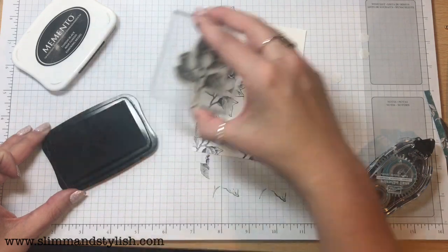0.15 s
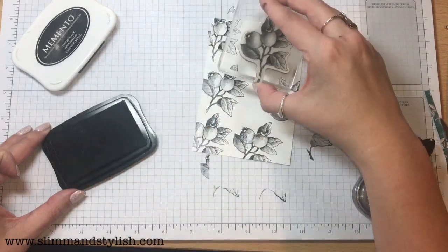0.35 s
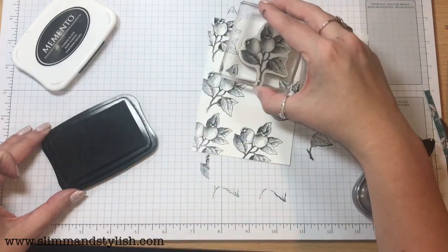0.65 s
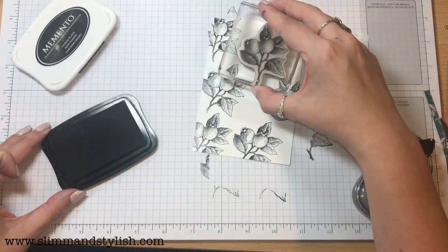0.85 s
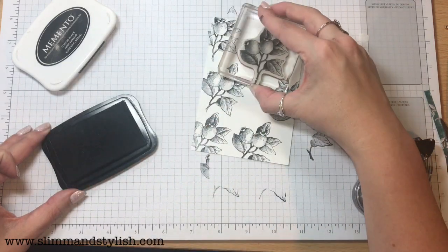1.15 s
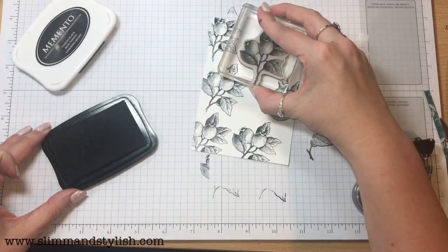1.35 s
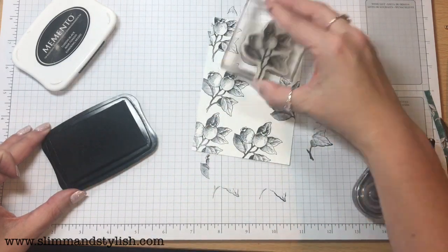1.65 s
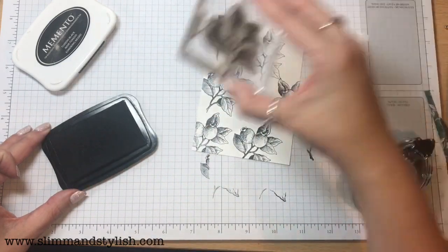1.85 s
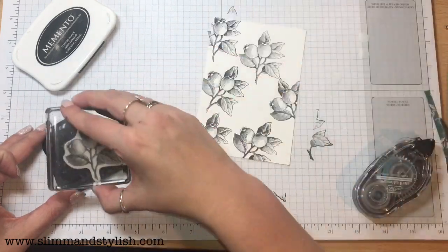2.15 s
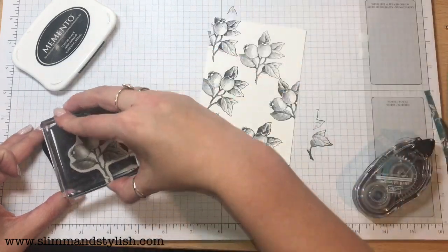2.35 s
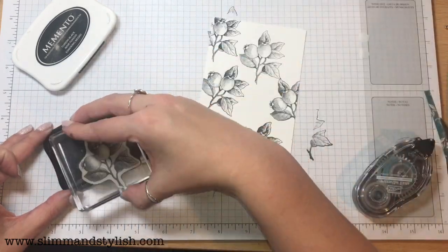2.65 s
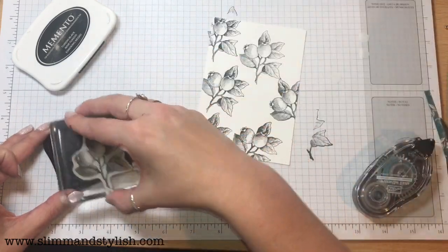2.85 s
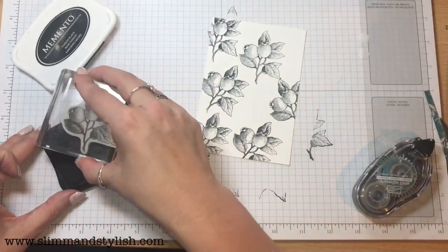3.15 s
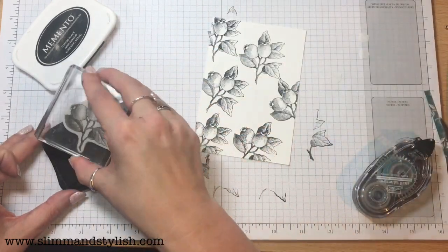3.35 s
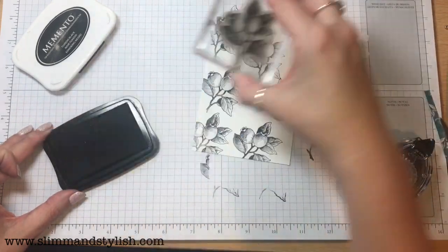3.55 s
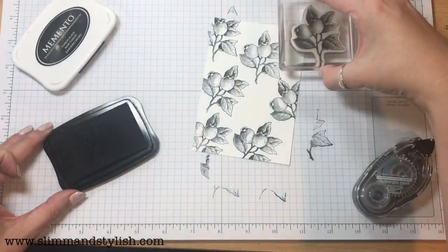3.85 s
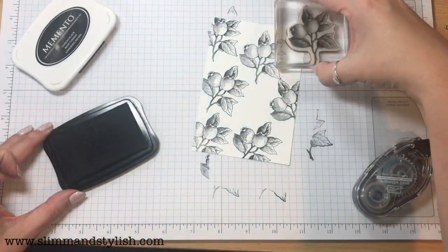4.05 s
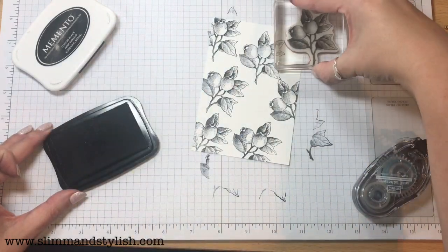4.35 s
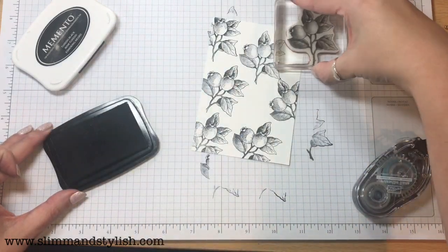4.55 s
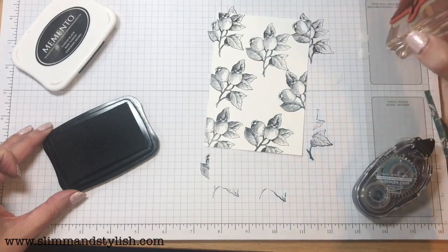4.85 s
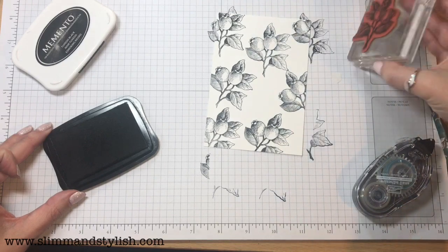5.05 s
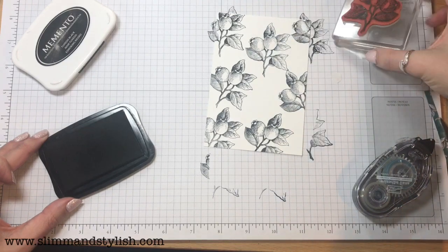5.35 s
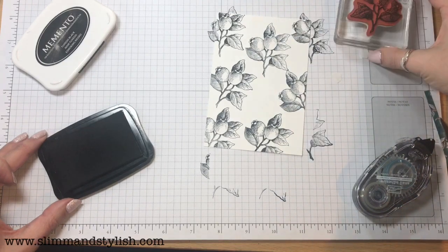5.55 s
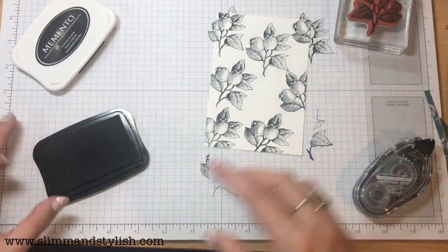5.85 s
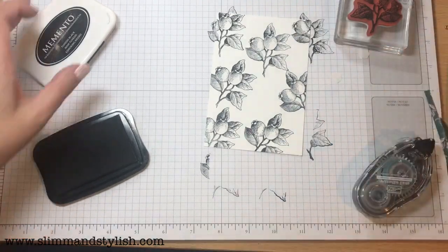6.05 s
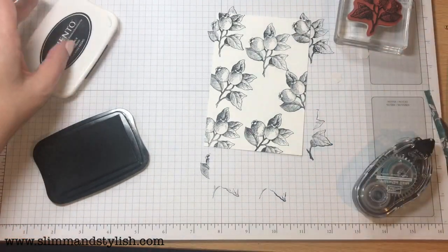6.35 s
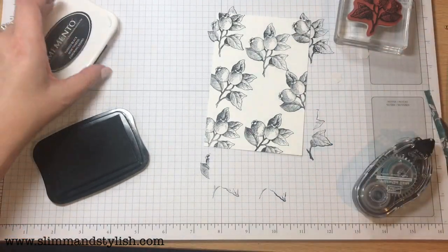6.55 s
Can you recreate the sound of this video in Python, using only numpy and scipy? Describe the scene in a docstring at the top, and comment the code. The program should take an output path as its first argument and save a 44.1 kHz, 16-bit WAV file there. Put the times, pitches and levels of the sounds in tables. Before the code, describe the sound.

An acrylic stamp block thumps on card and dabs an ink pad with sticky peels, then a plastic lid rattles.

```python
"""A craft table in a small room: an acrylic stamp block is pressed on card, peeled off, dabbed on an
ink pad and pressed again. Each landing is an impact that excites the modes of the table and the room
(a thump) and of the block (a clack). As the rubber lifts, threads of tacky ink snap in a crackle.
The block is set down and slid aside with a hiss of friction; then the plastic lid of the pad is
grabbed, and its shell rings as it knocks and skids on the mat."""
import sys
import numpy as np
from scipy import signal
from scipy.fft import rfft, irfft, next_fast_len
from scipy.io import wavfile
from scipy.ndimage import uniform_filter1d

SR = 44100
rng = np.random.default_rng(int(sys.argv[2]) if len(sys.argv) > 2 else 0)


def unload_audio(sound):
    """Save the sound as a 16-bit wav file, at the path given as the first command line argument."""
    columns = np.transpose(np.atleast_2d(sound))
    # keep every value between -1 and 1, then stretch to whole-number steps
    steps = np.round(np.clip(columns, -1, 1) * 32767)
    wavfile.write(sys.argv[1], SR, steps.astype(np.int16))


N = 295558
TIME = np.arange(N) / SR

# Spectral envelopes of the noises: frequency_hz, relative_density_db
ROOM_TONE_SPECTRUM = [(25, -19.5), (42, 0.5), (55, -2.5), (100, -6), (152, -10), (175, -12.5), (245, -16),
                      (295, -12), (330, -11), (375, -18.5), (540, -20.5), (2000, -30), (9000, -35.5),
                      (10300, -38.5), (12400, -34.5), (15800, -36.5)]
PAD_SPECTRUM = [(400, -4.5), (900, -9.5), (1500, -5), (1900, -21), (5000, -22), (12000, -32)]  # rubber wiping the ink pad
FAINT_HISS_SPECTRUM = [(600, -4.5), (1400, -6), (2200, -6), (3200, -13), (5000, -17), (12000, -27)]  # like a breath or a light brush
SLIDE_SPECTRUM = [(350, -2), (600, -3.5), (716, -10), (902, -0.5), (1140, -2.5), (1270, 0), (1380, -10),
                  (2010, -2.5), (4030, -9), (5440, -4.5), (7540, -7.5), (8520, -5), (15500, -13.5)]  # block sliding on the mat
FINGER_SPECTRUM = [(2000, -24), (4200, -14), (5000, -9), (5530, -1), (6200, -11), (7000, -2), (7600, -8),
                   (8580, 5), (9200, -11), (9600, 1), (10700, -13), (12100, -9), (14400, -14), (15800, -21)]  # skin dragging on acrylic
CREAK_SPECTRUM = [(1000, -5), (1900, 1), (2400, 2), (3400, -0.5), (4500, -11), (6500, -12), (12000, -36)]  # rubber rocking on the pad
TACK_SPECTRUM = [(600, -8), (1100, -2.5), (1800, -10), (3500, -3.5), (5500, 0), (9000, -5.5), (12000, -9),
                 (15500, -6.5)]  # sticky surfaces parting
BLOCK_DENSE_SPECTRUM = [(300, 16), (600, -10), (1200, -2), (2500, -2.5), (5000, -4), (9000, -13),
                        (15500, -13.5)]  # overlapping modes of the block
LID_DENSE_SPECTRUM = [(300, -12), (700, 6.5), (1300, 2), (3000, -1), (6000, -7.5), (10000, -13),
                      (15500, -15.5)]  # overlapping modes of the lid

# Resonances: pitch_hz, relative_level_db, t60_s
LOW_BOOM_MODES = [(45.3, -22, 0.83), (66.2, -27.5, 0.79), (103.6, -15.5, 0.078), (122, -12, 0.25),
                  (151.2, -12.5, 0.25), (188, -25, 0.22), (214, -18.5, 0.11)]  # low boom of the table and the room
TABLE_UPPER_MODES = [(331, -10, 0.14), (347, -26, 0.087), (428, -21, 0.062), (564, -12, .07)]
BLOCK_MODES = [(818, -2.5, 0.068), (986, 8.5, 0.042), (1252, 5, 0.047), (1350, -17, 0.048),
               (1970, -21, 0.023), (2320, -11, 0.029), (2530, 1, 0.02), (3400, -38, 0.039),
               (3610, 13, 0.012), (5700, -5, 0.074)]
LID_MODES = [(548, -0.5, 0.037), (827, 0.5, 0.041), (1241, 0, 0.076), (1400, 1.5, 0.056), (1940, -8, 0.078),
             (2190, -4, 0.026), (2780, -18, 0.041), (3530, -7, 0.031), (4420, -4, 0.037),
             (5340, -8.5, 0.041), (6570, -11.5, 0.039)]

# Early reflections from the near walls and ceiling: delay_s, gain_db
REFLECTIONS = [(0.0184, -20.5), (0.0305, -22.5), (.060, -25.5), (.108, -40)]
# Faint soft hisses, like a breath or a light brush: start_s, end_s, level_db
FAINT_HISSES = [(3.28, 3.42, -68.5), (4.39, 4.52, -73), (4.77, 5.05, -72.5), (5.9, 6.12, -70)]
# The rubber wipes over the ink pad: start_s, end_s, level_db
PAD_WIPES = [(1.97, 2.13, -70), (2.29, 2.38, -68), (2.72, 2.78, -74.5)]
# The rubber creaks as the block rocks; the hand leans on the table: peak_s, level_db
CREAKS = [(2.864, -64.5), (2.892, -63)]
HAND_NUDGES = [(1.685, -49), (2.105, -47), (2.143, -42), (2.349, -50), (2.813, -51), (4.298, -52.5),
               (4.547, -51.5)]
# Light ticks of the held block: start_s, level_db, tilt_db_per_octave, spot_hz
BLOCK_TICKS = [(2.324, -50.5, -9, 1580), (2.9603, -53, 0, 2660), (2.9886, -52, -4, 2700),
               (3.2212, -57, 4, 9000), (3.42, -56.5, 2, 2200), (4.651, -49, 2.5, 4550),
               (5.259, -43, -3, 1195)]
# The inked rubber peels off: start_s, release_s, crackle_db, fade_s, first_pop_db, last_pop_db,
# last_pop_tilt_db_per_octave
PEELS = [(1.5542, 1.6003, -50, .006, -55.5, -39.5, -7), (2.324, 2.383, -56.5, .022, -64, -60, 0),
         (2.7638, 2.7939, -58, .012, -54, -47.5, 6), (3.271, 3.296, -56.5, 0.036, -56, -38, 7.5),
         (4.47, 4.557, -56, 0.013, -58, -48, -0.5)]
# The block meets the ink pad: start_s, thump_db, contact_ms, low_modes_db, upper_modes_db, rim_tick_db
PAD_DABS = [(2.050, -42.5, 1.5, 0.5, 9, -55.5), (2.562, -32, 2.33, -0.5, 14, -43.5),
            (3.008, -36, 2.72, 4.5, 9, -60.5)]
# The lid is shoved: start_s, knock_db, tilt_db_per_octave, spot_hz, thump_db, contact_ms, bounce_db,
# skid_s, skid_db, catch_db
LID_SHOVES = [(6.095, -61, 0, 1200, -55.5, 1.2, -62, .017, -51.5, -61),
              (6.1469, -28.5, 4, 3170, -48, 1.1, -38, .031, -37.5, -27.5),
              (6.22, -29, -3, 550, -28, 0.46, -44, 0.022, -46, -41),
              (6.4834, -45.5, 1, 900, -37, 0.97, -41.5, 0.035, -47, -45.5)]
# Moments at which the lid's rim catches: share_of_skid
RIM_CATCHES = [.4, .72, 0.95]
# The block lands twice on card, then on the bare mat: start_s, flop_s, edge_db, clack_db,
# tilt_db_per_octave, spot_hz, thump_db, contact_ms, low_cut_hz, low_modes_db, upper_modes_db
BLOCK_LANDINGS = [(1.006, .007, -40, -41, -3, 980, -30.5, 1.76, 71.4, -0.5, 9),
                  (4.027, 0.0088, -40.5, -37.5, -4, 1160, -14, 1.82, 160, -9.5, -13),
                  (5.0322, .0118, -34.5, -24.5, -1, 1030, -18.5, 1.22, 114, 2, -1.5)]


def from_db(db):
    """Amplitude ratio of a level in decibels."""
    return 10 ** (np.asarray(db) / 20)


def unit(x):
    """Normalisation to unit energy."""
    return x / np.sqrt(np.sum(x ** 2) + 1e-20)


def add(out, start_s, x):
    """Superposition: a short sound is added from start_s on."""
    at = round(start_s * SR)
    out[at:at + len(x)] += x[:N - at]


def through(x, response):
    """Convolution: a linear system answers each sample with its impulse response."""
    return signal.fftconvolve(x, response)[:len(x)]


def coloured(x, spectrum):
    """Spectral shaping that keeps the power of white noise; 12 dB per octave roll-off in the bass."""
    size = next_fast_len(len(x) + SR // 20)
    hz, db = np.transpose(spectrum)
    bins = np.maximum(np.fft.rfftfreq(size, 1 / SR), 1)
    gain = from_db(np.interp(np.log(bins), np.log(hz), db))
    gain *= np.minimum(bins / hz[0], 1) ** 2
    gain /= np.sqrt(np.mean(gain ** 2))
    return irfft(rfft(x, size) * gain, size)[:len(x)]


def sized(hit, db, tilt_db):
    """Spectral tilt of tilt_db per octave; db is the level the energy would have within 1 ms."""
    tilt = [(2 ** octave, tilt_db * octave) for octave in (8, 14)]
    return from_db(db) * unit(coloured(hit, tilt)) * np.sqrt(SR / 1000)


def decay(t, t60_s):
    """Damping: the amplitude falls exponentially, by 60 dB in t60_s."""
    return np.exp(-np.log(1000) * t / t60_s)


def held(start_s, end_s, edge_s):
    """Envelope with exponential growth, a plateau at 1, and exponential decay."""
    return np.exp(-np.abs(TIME - np.clip(TIME, start_s, end_s)) / edge_s)


def ringing(modes, t):
    """Free vibration: each mode is a damped sinusoid, one to a row."""
    return np.array([from_db(db) * np.sin(2 * np.pi * hz * t) * decay(t, t60) for hz, db, t60 in modes])


def room_tone(level_db):
    """Stationary noise, strongest in the bass, forms the background."""
    return from_db(level_db) * coloured(rng.standard_normal(N), ROOM_TONE_SPECTRUM)


def reverberation(x, wet_db, t60_s, tail_cut_hz, echo_cut_hz):
    """Reflection: dull early echoes and a short diffuse tail follow the direct sound."""
    t, out = TIME[:SR // 2], x.copy()
    dull = signal.sosfilt(signal.butter(1, echo_cut_hz, fs=SR, output="sos"), x)
    for delay_s, db in REFLECTIONS:
        add(out, delay_s, from_db(db) * dull)
    build_up = 1 - np.exp(-t / 0.0013)
    tail = unit(rng.standard_normal(len(t)) * decay(t, t60_s) * build_up)
    tail = signal.sosfilt(signal.butter(1, tail_cut_hz, fs=SR, output="sos"), tail)
    return out + from_db(wet_db) * through(x, tail)


def grainy_noise(envelope, spectrum, grain_db):
    """Random amplitude modulation gives noise a grain, like the uneven slips of sliding friction."""
    roughness = unit(uniform_filter1d(rng.standard_normal(N), size=200)) * np.sqrt(N)
    noise = rng.standard_normal(N) * from_db(grain_db * roughness)
    return envelope * coloured(noise, spectrum)


def soft_hisses(spans, spectrum):
    """Broadband noise swells, holds and fades over each span, heard as a soft hiss."""
    envelope = sum(from_db(db) * held(start, end, edge_s=0.041) for start, end, db in spans)
    return grainy_noise(envelope, spectrum, grain_db=1.5)


def swarm(swells, clicks_per_s, spread_db):
    """Shot noise: random clicks swell and fade. Swells: peak_s, level_db, growth_s, fade_s."""
    envelope = sum(from_db(db) * np.exp(-np.maximum((s - TIME) / growth_s, (TIME - s) / fade_s))
                   for s, db, growth_s, fade_s in swells)
    sizes = from_db(spread_db * np.minimum(rng.exponential(1, N), 4))
    signs = rng.choice([-1, 1], N)
    occurs = rng.random(N) < clicks_per_s / SR
    return envelope * unit(sizes * signs * occurs) * np.sqrt(N)


def block_slide():
    """Friction grows with speed: the block creeps over the mat, then a push peaks and dies away."""
    push_s, push_width_s = 5.29, 0.088
    creep = from_db(-63.5) * held(5.08, 5.33, edge_s=0.035)
    push = from_db(-60.5) * np.exp(-np.abs(TIME - push_s) / push_width_s)
    return grainy_noise(creep + push, SLIDE_SPECTRUM, grain_db=1.0)


def finger_release():
    """Friction, then adhesion: the fingers drag off the block ever faster and come unstuck."""
    start_s, end_s, unstick_s, growth_db_per_s = 5.534, 5.675, 5.72, 27
    drag_db = -58.5 + growth_db_per_s * (np.clip(TIME, start_s, end_s) - start_s)
    envelope = from_db(drag_db) * held(start_s, end_s, edge_s=0.013)
    drag = grainy_noise(envelope, FINGER_SPECTRUM, grain_db=-0.3)
    unstick = swarm([(unstick_s, -61, 0.0087, 0.01)], clicks_per_s=9000, spread_db=6.0)
    return drag + coloured(unstick, TACK_SPECTRUM)


def thump(peak_s, db, contact_ms, low_db=0, upper_db=0, low_cut_hz=None):
    """Resonance: a force pulse rings the table's upper modes and the low boom of table and room."""
    out, t = np.zeros(N), TIME[:SR // 2]
    lead_s, contact_s = 0.015, contact_ms / 1000
    # The sound follows the velocity, the slope of the displacement.
    low = np.diff(ringing(LOW_BOOM_MODES, t).sum(axis=0), prepend=0)
    upper = np.diff(ringing(TABLE_UPPER_MODES, t).sum(axis=0), prepend=0)
    force = np.exp(-0.5 * ((t - lead_s) / contact_s) ** 2)
    # A brief contact moves only part of the table top, so it gives less bass.
    low_cut = signal.butter(2, low_cut_hz or 0.13 / contact_s, "high", fs=SR, output="sos")
    push = signal.sosfilt(low_cut, force + 1e-18)
    ring = through(push, from_db(low_db) * low + from_db(upper_db) * upper)
    gain = from_db(db) / np.abs(push).max()
    add(out, peak_s - lead_s, gain * (push + from_db(-3.5) * ring))
    return out


def body_response(modes, dense_spectrum, modes_db, dense_t60_s, crack_db):
    """Impulse response of a hard body: a crack, a dense ring and distinct modes of random strength."""
    t = TIME[:SR // 6]
    strengths = from_db(rng.normal(0, 0.36, len(modes))) * rng.choice([-1, 1], len(modes))
    envelope = unit(decay(t, dense_t60_s)) + from_db(crack_db) * unit(decay(t, 0.011))
    dense = coloured(rng.standard_normal(len(t)) * envelope, dense_spectrum)
    distinct = unit(strengths @ ringing(modes, t))
    return unit(unit(dense) + from_db(modes_db) * distinct)


def impacts(hits, modes, dense_spectrum, modes_db, dense_t60_s, crack_db, chatter_db, spot_db):
    """Impact excitation: a click and its chatter ring a body; the struck spot stresses one band.
    Hits: start_s, level_db, chatter_ms, tilt_db_per_octave, spot_hz."""
    out, t = np.zeros(N), TIME[:SR // 6]
    clicks_per_s = 3000
    for s, db, chatter_ms, tilt_db, spot_hz in hits:
        clicks = rng.standard_normal(len(t)) * (rng.random(len(t)) < clicks_per_s / SR)
        force = from_db(chatter_db) * clicks * np.exp(-t * 1000 / chatter_ms)
        force[0] += 1
        hit = through(force, body_response(modes, dense_spectrum, modes_db, dense_t60_s, crack_db))
        spot = signal.lfilter(*signal.iirpeak(spot_hz, Q=5.0, fs=SR), hit)
        add(out, s, sized(hit + from_db(spot_db) * spot, db, tilt_db))
    return out


def clacks(hits):
    """Hard impacts excite the heavily damped modes of the acrylic block."""
    return impacts(hits, BLOCK_MODES, BLOCK_DENSE_SPECTRUM, modes_db=-8.5, dense_t60_s=0.053,
                   crack_db=-7.0, chatter_db=3.0, spot_db=3.0)


def pressing():
    """Stick-slip makes the rubber creak, while light impacts tick the block and nudge the table."""
    chatter_ms, growth_s, fade_s = 0.77, 0.0055, 0.017
    ticks = clacks([(s, db, chatter_ms, tilt_db, spot_hz) for s, db, tilt_db, spot_hz in BLOCK_TICKS])
    slips = swarm([(s, db, growth_s, fade_s) for s, db in CREAKS], clicks_per_s=1500, spread_db=1.0)
    nudges = sum(thump(s, db, contact_ms=1.7, low_db=-4, upper_db=16) for s, db in HAND_NUDGES)
    return ticks + coloured(slips, CREAK_SPECTRUM) + nudges


def ink_peels():
    """Adhesive failure: one thread of ink snaps, a growing swarm follows, and the last patch pops."""
    growth_share, pop_t60_s, first_tilt_db = 0.32, 0.010, -1
    swells = [(release_s, db, growth_share * (release_s - start_s), fade_s)
              for start_s, release_s, db, fade_s, *_ in PEELS]
    out = coloured(swarm(swells, clicks_per_s=7500, spread_db=5.0), TACK_SPECTRUM)
    t = TIME[:SR // 50]
    for start_s, release_s, _, _, first_db, last_db, last_tilt_db in PEELS:
        for s, db, tilt_db in (start_s, first_db, first_tilt_db), (release_s, last_db, last_tilt_db):
            pop = coloured(rng.standard_normal(len(t)) * decay(t, pop_t60_s), TACK_SPECTRUM)
            add(out, s, sized(pop, db, tilt_db))
    return out


def card_snap(snap_s):
    """Elastic release: the clinging card flicks and snaps off the block, then slaps the table."""
    flick = (snap_s - 0.0075, -39, 2.1, 0.5, 1090)
    snap = (snap_s, -35, 2.2, 0.5, 3160)
    slap = thump(snap_s + 0.00423, db=-46, contact_ms=0.87, low_db=5.5, upper_db=13.5, low_cut_hz=220)
    return clacks([flick, snap]) + slap


def pad_dabs():
    """Cushioned impact: the pad's rim ticks, then the felt softens the blow and bottoms out."""
    rim_lead_s, rim_chatter_ms, rim_tilt_db, rim_hz = 0.011, 2.9, -0.5, 1310
    bottom_lag_s = 0.00496
    thumps, ticks = np.zeros(N), []
    for s, db, contact_ms, low_db, upper_db, tick_db in PAD_DABS:
        ticks.append((s - rim_lead_s, tick_db, rim_chatter_ms, rim_tilt_db, rim_hz))
        thumps += thump(s, db, contact_ms, low_db, upper_db)
        thumps += thump(s + bottom_lag_s, tick_db + 11.5, contact_ms=0.99, low_db=-15, upper_db=1)
    return thumps + clacks(ticks)


def lid_rattle():
    """Shell resonance: the shoved lid knocks, bounces, skids with its rim catching, and bumps to rest."""
    table_lag_s, bounce_s, growth_s, fade_s = 0.00134, 0.0075, 0.014, 0.0093
    coupling = dict(low_db=5.5, upper_db=-12.5, low_cut_hz=171)  # how the light lid drives the table
    thumps, hits, skids = np.zeros(N), [], []
    for (s, knock_db, tilt_db, spot_hz, thump_db, contact_ms,
         bounce_db, skid_s, skid_db, catch_db) in LID_SHOVES:
        knock = (s, knock_db, 2.8, tilt_db, spot_hz)
        bounce = (s + bounce_s, bounce_db, 0.9, 2, 820)
        catches = [(s + share * skid_s, catch_db, 2.9, 1.5, 1880) for share in RIM_CATCHES]
        hits += [knock, bounce, *catches]
        skids.append((s + skid_s, skid_db, growth_s, fade_s))
        thumps += thump(s + table_lag_s, thump_db, contact_ms, **coupling)
        thumps += thump(s + bounce_s, thump_db - 7.5, contact_ms=1.8, **coupling)
        thumps += thump(s + skid_s, skid_db + 0.5, contact_ms=0.91, **coupling)
    knocks = impacts(hits, LID_MODES, LID_DENSE_SPECTRUM, modes_db=1.0, dense_t60_s=0.089,
                     crack_db=-0.5, chatter_db=-2.5, spot_db=0.0)
    slips = swarm(skids, clicks_per_s=6400, spread_db=2.0)
    # Each slip radiates directly and rings the shell, whose neighbouring modes swing in opposite senses.
    senses = (-1) ** np.arange(len(LID_MODES))
    shell = unit(senses @ ringing(LID_MODES, TIME[:SR // 6]))
    return thumps + knocks + coloured(slips, LID_DENSE_SPECTRUM) + from_db(-8.0) * through(slips, shell)


def block_landings():
    """Successive impacts: an edge touches, the weight thumps, the face clacks flat, the block settles."""
    thumps, hits = np.zeros(N), []
    for (s, flop_s, edge_db, clack_db, tilt_db, spot_hz,
         thump_db, contact_ms, low_cut_hz, low_db, upper_db) in BLOCK_LANDINGS:
        weight_s, flat_s, settle_s = s + 0.674 * flop_s, s + flop_s, s + 2.3 * flop_s
        edge = (s, edge_db, 1.6, tilt_db + 1.5, 2260)
        face = (flat_s, clack_db, 3.5, tilt_db, spot_hz)
        settling = (settle_s, clack_db - 6.5, 11.5, -4.5, 830)  # a longer, duller chatter
        hits += [edge, face, settling]
        thumps += thump(weight_s, thump_db, contact_ms, low_db, upper_db, low_cut_hz)
        thumps += thump(flat_s, clack_db - 4, contact_ms=0.59, upper_db=-0.5)
        thumps += thump(settle_s, clack_db - 7.5, contact_ms=1.1, low_db=-2.0, upper_db=-1.0)
    return thumps + clacks(hits)


def scene():
    """Superposition of reverberant impacts and peels, direct rubs and hisses, and room tone."""
    handling = block_landings() + pad_dabs() + pressing() + ink_peels()
    handling += card_snap(snap_s=1.6003) + lid_rattle()
    direct = soft_hisses(PAD_WIPES, PAD_SPECTRUM) + soft_hisses(FAINT_HISSES, FAINT_HISS_SPECTRUM)
    direct += block_slide() + finger_release()
    background = room_tone(level_db=-64)
    in_room = reverberation(handling, wet_db=-18.0, t60_s=0.45, tail_cut_hz=6000, echo_cut_hz=500)
    return (background + direct + in_room)[None]


def record(dry):
    """Band limiting: steep filters remove the deepest bass and the highest treble."""
    low_cut_hz, high_cut_hz = 42, 15900
    high_pass = signal.cheby1(7, 0.5, low_cut_hz, "high", fs=SR, output="sos")
    low_pass = signal.ellip(10, 0.2, 70, high_cut_hz, fs=SR, output="sos")
    return signal.sosfilt(low_pass, signal.sosfilt(high_pass, dry))


dry = scene()
out = record(dry)
unload_audio(out)
```